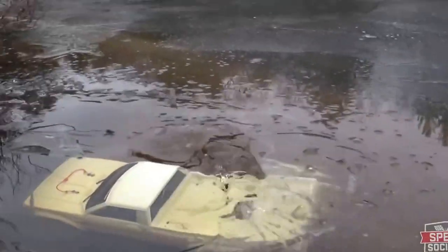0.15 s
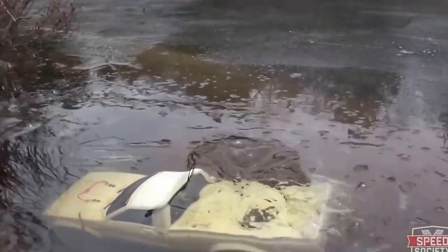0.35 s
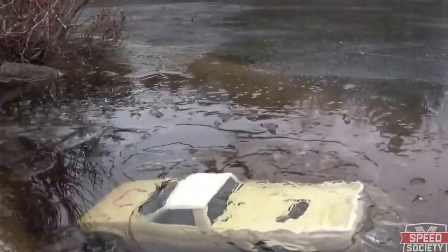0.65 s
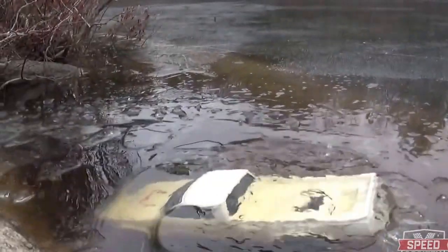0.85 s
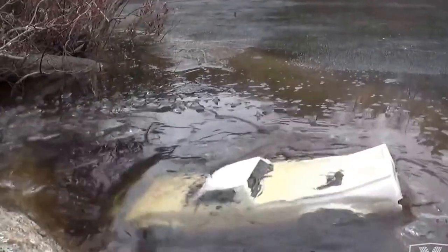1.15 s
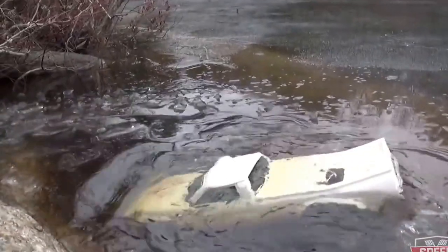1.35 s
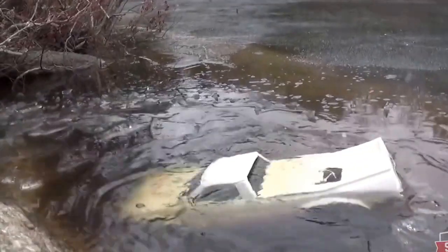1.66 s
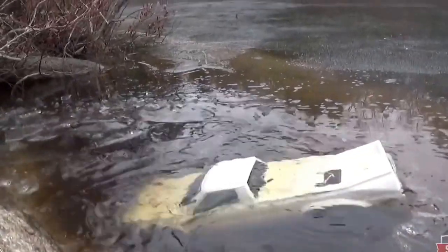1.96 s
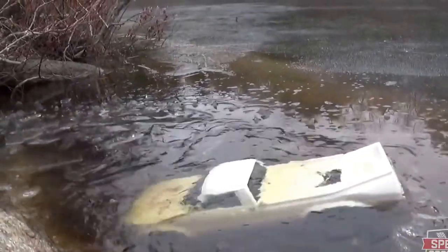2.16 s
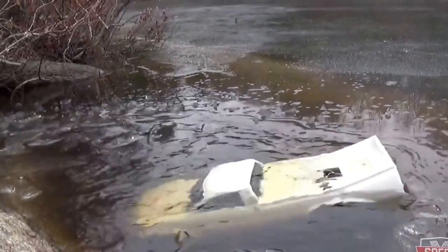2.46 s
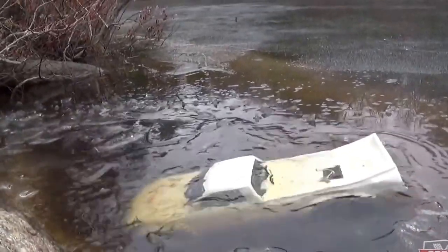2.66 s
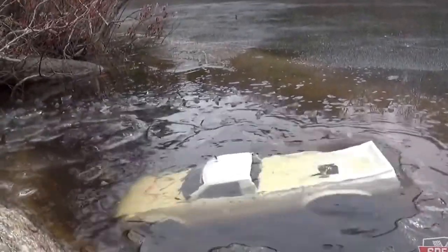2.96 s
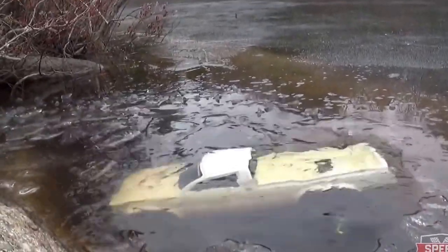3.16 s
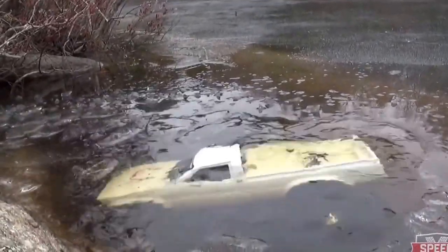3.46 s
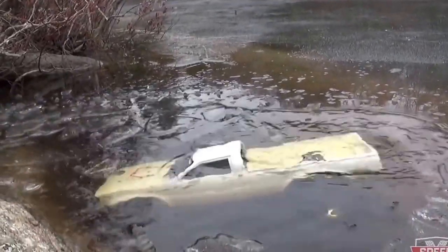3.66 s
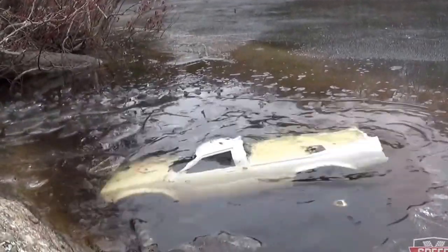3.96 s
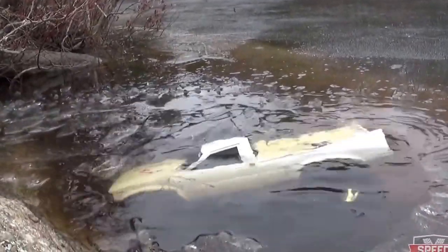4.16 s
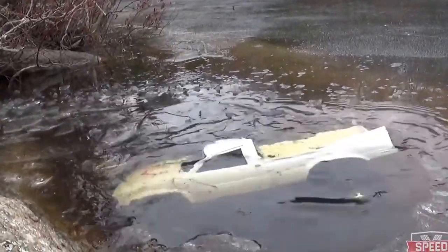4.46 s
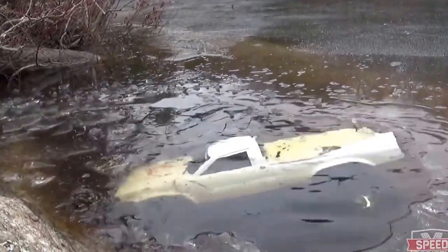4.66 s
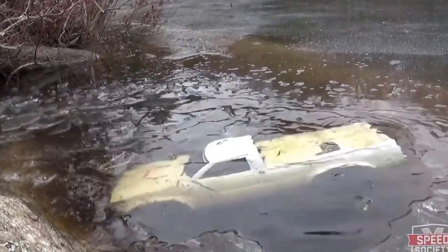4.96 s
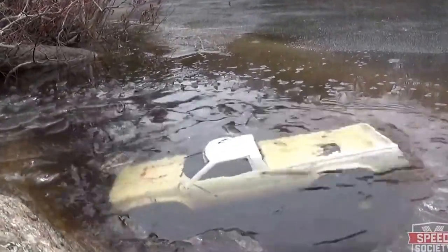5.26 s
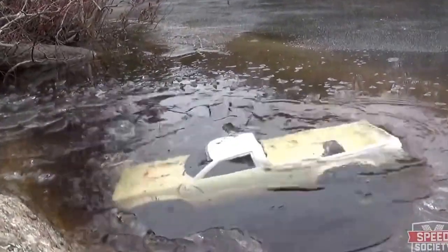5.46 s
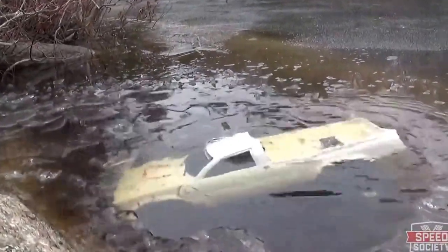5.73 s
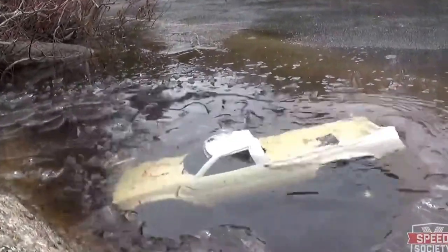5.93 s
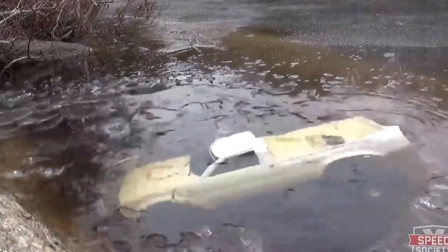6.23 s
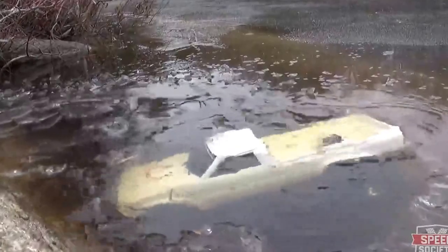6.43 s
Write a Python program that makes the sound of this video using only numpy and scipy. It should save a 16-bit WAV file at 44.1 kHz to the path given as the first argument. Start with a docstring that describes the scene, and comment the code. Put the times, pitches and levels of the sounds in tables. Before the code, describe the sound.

Water sloshes, plops and gurgles around a toy truck in a pond, with sharp little splashes and drips.

```python
"""At a shallow pond, a stereo microphone close to a floating toy truck whose wheels churn the water.
Water laps and sloshes under the thin hollow plastic shell, where air pockets plop and gurgle.
Drops snap on the shell and ring it, droplets click on open water, spray and foam hiss.
Behind this a faint tick pulses, something rattles once and a few dull thumps sound;
a low rumble and hiss lie under everything."""
import sys
import numpy as np
from scipy import signal
from scipy.fft import rfft, irfft, next_fast_len
from scipy.io import wavfile
from scipy.ndimage import uniform_filter1d, map_coordinates

SR = 44100
rng = np.random.default_rng(int(sys.argv[2]) if len(sys.argv) > 2 else 0)


def store_wav(level_fs):
    """Save 16-bit WAV to argv[1]."""
    pcm = np.round(np.clip(np.atleast_2d(level_fs), -1, 1) * 32767)
    wavfile.write(sys.argv[1], SR, pcm.T.astype(np.int16))


N = 290685
TIME = np.arange(N) / SR


def amp(db):
    return 10 ** (np.asarray(db) / 20)


def unit(x):
    return x / np.sqrt(np.mean(x ** 2) + 1e-20)


def along(points, hz):
    """Interpolates (Hz, value) points on a log axis."""
    freqs, values = np.transpose(points)
    return np.interp(np.log(hz + 1), np.log(freqs + 1), values)


def curve(rows, column):
    """One column of a timed table, one value per sample."""
    return np.interp(TIME, np.transpose(rows)[0], np.transpose(rows)[column])


def wobble(rate):
    """A smooth random curve, rate knots a second."""
    return map_coordinates(rng.standard_normal(int(N * rate / SR) + 4), [TIME * rate])


def filtered(x, response):
    """x through a complex response of frequency."""
    size = next_fast_len(N + SR // 2)
    return irfft(rfft(x, size) * response(np.fft.rfftfreq(size, 1 / SR)), size)[..., :N]


def resonances(modes):
    """Causal response of a few (Hz, width in Hz, dB) modes."""
    return lambda f: sum((-1) ** k * amp(db) * 1j * f * width / (hz * hz - f * f + 1j * f * width)
                         for k, (hz, width, db) in enumerate(modes))


# Noise across the microphone pair. Each row: frequency in Hz, left-right correlation.
STEREO_LIKENESS = [(300, 0.99), (2000, 0.83), (9000, 0.98)]

def rush(gain, patchy_db):
    """Stereo noise of rms 1, coloured by gain(Hz), with random louder and softer patches."""
    spectra = signal.stft(rng.standard_normal((2, N)), nperseg=256)[2]
    patches = uniform_filter1d(uniform_filter1d(rng.standard_normal(spectra.shape[1:]), 5, 0), 6, 1)
    pair = signal.istft(spectra * amp(patchy_db * unit(patches)), nperseg=256)[1][:, :N]
    angle = lambda hz: np.arccos(np.clip(along(STEREO_LIKENESS, hz), -1, 1)) / 2
    mid, side = filtered(pair, lambda hz: gain(hz) * [np.cos(angle(hz)), np.sin(angle(hz))])
    return unit(np.array([mid + side, mid - side]))


def place(start, waves, pan_db=0):
    """Sums one short wave per start time into stereo, panned to the truck plus pan_db."""
    at = np.round(start * SR).astype(int)
    pan_db = pan_db + curve(FOAM_AND_PAN, column=2)[at]
    samples = (at[:, None] + np.arange(waves.shape[1])).ravel()
    panned = [waves * amp(side * pan_db / 2)[:, None] for side in (1, -1)]
    return np.array([np.bincount(samples, channel.ravel(), N + SR)[:N] for channel in panned])


def bubbles(hz, t60, rise, attack_s, size):
    """Damped sines, one per row, whose pitch glides by the share rise every t60 seconds."""
    t = np.arange(size) / SR
    hz, t60, rise = (np.reshape(x, (-1, 1)) for x in (hz, t60, rise))
    phase = 2 * np.pi * hz * (t + rise * t * t / (2 * t60))
    return np.sin(phase) * amp(-60 * t / t60) * (1 - np.exp(-t / attack_s)) * (phase < np.pi * SR * t)


def swarm(level_db, centre_hz, octaves, cycles, spread, pan_db, count, size):
    """Randomly timed bubbles whose joint loudness follows a level curve."""
    when, rank = rng.random((count, 2)).T
    pitch, glide, pan = rng.standard_normal((count, 3)).T
    hz = np.clip(centre_hz * 2 ** (octaves * pitch), 300, 11500)
    waves = bubbles(hz, cycles / hz, 0.26 * glide, attack_s=0.0002, size=size)
    strength = amp(-spread * np.log(rank + .02))
    return amp(level_db) * unit(place(when * (N - 1) / SR, waves * strength[:, None], pan_db * pan))


# The air around the pond. Each row: frequency in Hz, relative level in dB.
AMBIENT_SPECTRUM = [(20, -24), (60, 0), (181, 2), (380, -7), (1560, -34.5), (4500, -30), (9500, -41),
                    (15800, -32)]
# Narrow bands in the rumble. Each row: centre in Hz, width in Hz, base level in dB.
DRONE_BANDS = [(99.2, 12.4, -59.5), (152.7, 9.6, -63)]

def ambience():
    """Rumble and hiss swell a little with the wash; droning bands sag slightly as the foam thins."""
    db = -42.5 + 0.2 * curve(WASH_LEVELS, column=1) + 1.26 * wobble(2.76)
    bed = amp(db) * rush(lambda hz: amp(along(AMBIENT_SPECTRUM, hz)), patchy_db=1.7)
    drone = 0
    for hz, width, band_db in DRONE_BANDS:
        band = filtered(rng.standard_normal(N), lambda f: 1 / (1 + (2 * (f - hz) / width) ** 2))
        drone += amp(band_db) * unit(band)
    return bed + amp(0.039 * (curve(FOAM_AND_PAN, column=1) + 48.0)) * drone


def tick():
    """A faint high tick at a steady pace, every other one weaker."""
    first_s, per_second = 0.0258, 29.92
    k = np.arange(int(N / SR * per_second) - 1)
    db = -50 - 4 * (k % 2 == 0)
    ping = bubbles(hz=2710, t60=0.018, rise=0, attack_s=0.0017, size=1500)
    return place(first_s + k / per_second, ping * amp(db)[:, None])


# The ring of the faint rattle. Each row: frequency in Hz, width in Hz, relative gain in dB.
RATTLE_MODES = [(1670, 65, 3), (2470, 99, -4)]

def rattle():
    """One short run of uneven small knocks into two resonances."""
    start_s, length_s, edge_s = 5.54, 0.2, 0.024
    gate = np.clip(np.minimum(TIME - start_s, start_s + length_s - TIME) / edge_s + .5, 0, 1)
    knocks = amp(2.8 * wobble(120)) * rng.standard_normal(N)
    return amp(-58) * gate * unit(filtered(knocks, resonances(RATTLE_MODES)))


# Dull thumps behind the water. Each row: start in seconds, level in dB, starting pitch in Hz.
LOW_THUMPS = [(5.071, -33.5, 130), (5.575, -34, 214), (6.077, -35, 174), (6.166, -41, 195)]

def thumps():
    """Soft low gulps that rise in pitch, with a hollow rough tail."""
    start, db, hz = np.transpose(LOW_THUMPS)
    t = np.arange(12000) / SR
    envelope = amp(db[:, None] - 60 * t / 0.42) * (1 - np.exp(-t / 0.0075))
    tail = place(start, rng.standard_normal(envelope.shape) * envelope)
    gulp = bubbles(hz, t60=0.087, rise=0.5, attack_s=0.0046, size=len(t)) * amp(db)[:, None]
    body = resonances([(270, 340, 7.2)])
    return place(start, gulp) + filtered(tail, lambda f: body(f) ** 2 / (1 + (f / 600) ** 4))


# The steady wash at the wheels. Each row: time in seconds, base levels of slosh and of spray in dB.
WASH_LEVELS = [(0, -50.5, -61), (1.3, -59, -57.5), (2.1, -48, -68.5), (3.0, -54.5, -63), (3.75, -61, -68.5),
               (4.5, -57.5, -58), (5.5, -61.5, -65), (5.9, -49.5, -58), (6.45, -43, -53),
               (6.59, -50, -51.5)]
# Waves meeting the shell. Each row: crest time, nominal rise and fall, all in seconds,
# then base levels of slosh and of spray in dB.
SHELL_LAPS = [(1.03, 0.17, 0.15, -43.5, -80), (1.58, 0.062, 0.05, -39.5, -49),
              (1.84, 0.093, 0.035, -38.5, -51), (2.261, 0.0043, 0.035, -31.5, -47),
              (2.444, 0.0215, 0.056, -39.5, -39.5), (2.56, 0.011, 0.11, -43, -57.5),
              (2.77, 0.088, 0.069, -44, -47), (3.094, 0.067, 0.052, -41.5, -47),
              (3.91, 0.063, 0.1, -47.5, -73), (4.282, 0.064, 0.06, -39, -45.5),
              (4.69, 0.11, 0.049, -47, -51.5), (6.15, 0.0071, 0.014, -31.5, -50.5)]
SLOSH_COLUMN, SPRAY_COLUMN = 1, 2
SLOSH_PACE, SPRAY_PACE = 0.81, 1.09  # a lap's spray rises and falls faster than its slosh

def churn(column, pace, lumps_db):
    """Level in dB of the wash plus the lumpier laps, which swell to a crest and drain."""
    foot_db, roundness = -9, 1.93  # roundness 1 is a pointed crest, more is flatter
    t, laps = TIME[::64], np.transpose(SHELL_LAPS)[:, :, None]
    crest, rise, fall = laps[:3]
    from_crest = pace * np.where(t < crest, (crest - t) / rise, (t - crest) / fall)
    lap_db = laps[2 + column] + foot_db * from_crest ** roundness
    lap_power = np.interp(TIME, t, np.sum(amp(lap_db) ** 2, axis=0))
    wash_power = amp(curve(WASH_LEVELS, column) + 0.67 * lumps_db) ** 2
    return 10 * np.log10(wash_power + lap_power * amp(lumps_db) ** 2)


# Foam at the truck, and where the truck sits before the microphone.
# Each row: time in seconds, base foam level in dB, the truck's left-over-right balance in dB.
FOAM_AND_PAN = [(0, -52.5, 2), (1.4, -51.5, 0), (2.6, -53, -1), (3.3, -60.5, 2.5), (5.8, -66.5, -0.5),
                (6.59, -54, 11.5)]
# The colour of the fizz. Each row: frequency in Hz, relative level in dB.
FOAM_SPECTRUM = [(900, -6), (1600, -2.5), (2800, 5.5), (5500, 0), (9000, 6), (12000, -2), (15800, -25)]

def foam():
    """Foam hisses in thin spatters and swells a little with the spray."""
    spray_db = churn(SPRAY_COLUMN, SPRAY_PACE, lumps_db=-16.5)
    db = curve(FOAM_AND_PAN, column=1) + 0.23 * (spray_db + 52.0)
    spatter_db = 2.07 * wobble(13) + 1.64 * wobble(240) ** 2
    return amp(db + spatter_db) * rush(lambda hz: amp(along(FOAM_SPECTRUM, hz)), patchy_db=1.5)


# Spray thrown up around the truck. Each row: frequency in Hz, relative level in dB.
SPRAY_SPECTRUM = [(900, 0.5), (2000, 3), (4000, -3.5), (9500, -10.5), (12000, -19), (15500, -44)]

def spray():
    """Wash and laps throw a bright hiss in spurts and a dense shower of droplets."""
    db = churn(SPRAY_COLUMN, SPRAY_PACE, lumps_db=3.8 * wobble(45))
    hiss = amp(db) * rush(lambda hz: amp(along(SPRAY_SPECTRUM, hz)), patchy_db=5.5)
    shower = swarm(db - 6, 3700, octaves=0.82, cycles=5.9, spread=2.0, pan_db=7.5, count=2500, size=300)
    return hiss + shower


# Big droplets on the pond beside the truck. Each row: start in seconds, level in dB, colour in Hz.
POND_DRIPS = [(0.243, -24, 8470), (0.306, -19, 5340), (0.395, -23, 6700), (0.642, -32, 3240),
              (0.808, -38, 4286), (1.249, -31, 4840), (1.321, -29, 3550), (1.663, -36, 3240),
              (2.0415, -37, 2740), (2.9376, -30, 4000), (2.948, -33, 3060), (2.972, -27.5, 7140),
              (3.504, -32.5, 4120), (3.9777, -35, 2700), (4.686, -30.5, 3000), (4.9232, -27.5, 8300),
              (4.991, -27.5, 7200), (5.1219, -31, 8100), (5.1602, -33.5, 2900), (5.779, -36, 4100),
              (6.2032, -32, 2750)]

def drips():
    """A droplet on open water ticks, a few cycles in a spit of noise; small ones follow the foam level."""
    when, rank, pitch = rng.random((800, 3)).T
    small_start = when * (N - 1) / SR
    foam_db = curve(FOAM_AND_PAN, column=1)[(small_start * SR).astype(int)]
    small_drips = [small_start, foam_db + 9 - 4 * np.log(rank + .04), 1700 * 5 ** pitch]
    start, db, hz = np.concatenate([np.transpose(POND_DRIPS), small_drips], axis=1)
    t = np.arange(500) / SR
    spit = 0.8 * rng.standard_normal((len(start), len(t))) * amp(-60 * t / 0.0034)
    ping = bubbles(hz, t60=11.0 / hz, rise=0, attack_s=0.00008, size=len(t))
    ticks = place(start, (ping + spit) * amp(db)[:, None], pan_db=3 * rng.standard_normal(len(start)))
    return filtered(ticks, lambda f: 1j * f / (1500 + 1j * f) / (1 + (f / 11000) ** 6))


# Air pockets filling up. Each row: start and length in seconds, level in dB, first and last pitch in Hz.
FILLING_POCKETS = [(1.168, 0.037, -43.5, 2840, 1730), (3.871, 0.079, -49, 1780, 1150),
                   (4.187, 0.0694, -51, 1515, 1222)]

def gurgles():
    """A stuttering tone sinks in pitch while water works into a pocket of air."""
    start, length, db, first_hz, last_hz = np.transpose(FILLING_POCKETS)[:, :, None]
    progress = np.clip(np.arange(4000) / SR / length, 0, 1)
    swell = np.sqrt(np.sin(np.pi * progress).clip(0))
    stutter = 0.61 + unit(uniform_filter1d(rng.standard_normal(progress.shape), size=50, axis=1))
    phase = 2 * np.pi * np.cumsum(first_hz * (last_hz / first_hz) ** progress, axis=1) / SR
    return place(start[:, 0], amp(db) * swell * stutter * np.sin(phase))


# Slopping water, heard close. Each row: frequency in Hz, relative level in dB.
SLOSH_SPECTRUM = [(200, -7), (300, 4), (800, 0.5), (2500, -12), (6000, -36)]
# The air under the shell. Each row: resonance in Hz, width in Hz, relative gain in dB.
HOLLOW_MODES = [(428, 98, -4.5), (613, 71, 2), (984, 116, 1.5), (1202, 160, -1.5)]

def slosh():
    """Water slops under the shell: lumpy noise, the boom of the hollow and ringing bubbles."""
    db = churn(SLOSH_COLUMN, SLOSH_PACE, lumps_db=5.2 * wobble(25))
    wash = amp(db - 6.0) * rush(lambda hz: amp(along(SLOSH_SPECTRUM, hz)), patchy_db=2.5)
    boom = amp(db - 10.5) * rush(lambda hz: np.abs(resonances(HOLLOW_MODES)(hz)), patchy_db=3.0)
    rings = swarm(db - 10, 857.4, octaves=0.706, cycles=43, spread=-1.5, pan_db=2.5, count=600, size=3500)
    return wash + boom + rings


# Drops landing on the shell. Each row: start in seconds, level in dB, colour in Hz.
SHELL_DROPS = [(0.356, -28, 7380), (0.524, -26.5, 9900), (1.068, -25, 10380), (1.404, -32, 2550),
               (1.4381, -28, 2560), (1.577, -31, 3600), (1.7872, -30, 4400), (1.849, -23.5, 3790),
               (1.9408, -32.5, 2380), (1.981, -26, 3760), (2.22, -31.5, 3070), (2.2558, -9.5, 7530),
               (2.292, -23, 6700), (2.4235, -23, 3560), (2.4375, -13.5, 3840), (2.47, -27, 3540),
               (2.501, -27.5, 3850), (2.576, -30.5, 4060), (2.708, -29.5, 5700), (2.893, -31.5, 4670),
               (3.083, -30, 3740), (3.1898, -30.5, 8900), (4.163, -35, 2200), (4.238, -29.5, 3950),
               (4.3899, -35, 2600), (4.413, -27, 8400), (4.54, -31.5, 3300), (4.809, -29, 4520),
               (6.2353, -30.5, 2780)]
# The ring of the thin plastic. Each row: resonance in Hz, width in Hz, relative gain in dB.
SHELL_MODES = [(3780, 260, 1), (7200, 900, -39)]

def snaps():
    """Each drop spits noise at its own colour, cracks and rings the plastic; big drops splatter longer."""
    start, db, hz = np.transpose(SHELL_DROPS)
    t = np.arange(3000) / SR
    t60 = 0.016 * amp(0.27 * (db[:, None] + 52.0))
    noise = rng.standard_normal((len(start), len(t)))
    pan = noise[:, 0]
    envelope = (1 - np.exp(-t / 0.000063)) * amp(db[:, None] - 60 * t / t60)
    ring = filtered(place(start, noise * envelope, 2.1 * pan), resonances(SHELL_MODES))
    flutter = 0.74 + unit(uniform_filter1d(rng.standard_normal(noise.shape), size=24, axis=1))
    spit = place(start, flutter * envelope * np.sin(2 * np.pi * hz[:, None] * t), 0.62 * pan)
    impact = place(start, noise * envelope * amp(1.5 - 25 * t / t60), 3.2 * pan)
    crack = filtered(impact, resonances([(9250, 3900, -5.5)]))
    return filtered(crack + amp(-9) * spit + amp(-2) * ring, lambda f: 1 / (1 + (f / 11800) ** 8))


# Air pockets under the shell, heard close. Each row: start in seconds, level in dB, pitch in Hz.
AIR_POCKETS = [(0.007, -22.5, 599), (0.306, -34, 1630), (0.493, -31, 593), (1.365, -34, 937),
               (1.437, -27.5, 1960), (1.531, -27, 1240), (1.554, -28, 1200), (1.602, -26.5, 1200),
               (1.627, -25.5, 615), (1.693, -32.5, 613), (1.792, -23.5, 517), (1.853, -20, 591),
               (1.869, -23.5, 537), (1.981, -27, 630), (2.057, -25, 621), (2.218, -17.5, 634),
               (2.258, -10, 613), (2.293, -17, 449), (2.425, -25, 1106), (2.473, -18.5, 551),
               (2.555, -23.5, 504), (2.59, -25.5, 1262), (2.782, -24, 1140), (2.81, -21.5, 561),
               (3.126, -24.5, 598), (3.36, -31, 584), (4.041, -31.5, 1710), (4.18, -29, 1247),
               (4.267, -28, 770), (4.391, -28.5, 1750), (4.661, -21, 1500), (4.709, -32.5, 615),
               (4.765, -35, 478), (4.807, -25.5, 1484), (5.003, -36, 1160), (5.304, -36.5, 632),
               (5.399, -34.5, 606), (6.553, -31.5, 1940)]

def plops():
    """Each air pocket rings unevenly, small ones more briefly, and knocks the hollow with a rough push."""
    start, db, hz = np.transpose(AIR_POCKETS)
    t, level = np.arange(3500) / SR, amp(db)[:, None]
    t60 = 0.065 * (700 / hz[:, None]) ** 0.71
    noise = rng.standard_normal((len(start), len(t)))
    glide, pan = noise[:, 0], noise[:, 1]
    ring = bubbles(hz, t60, rise=0.065 * glide, attack_s=0.94 / hz[:, None], size=len(t))
    ring *= 1 + 0.3 * unit(uniform_filter1d(noise, size=150, axis=1))
    push_envelope = amp(-60 * t / (0.38 * t60)) * (1 - np.exp(-t / 0.00052))
    push = place(start, noise * push_envelope * level, 0.5 * pan)
    knock = filtered(push, resonances(HOLLOW_MODES))
    slap = filtered(push, lambda f: resonances([(2000, 3000, -2)])(f) ** 2)
    return amp(-4) * place(start, ring * level, 1.94 * pan) + amp(9.5) * knock + slap


def scene():
    """The water at the truck, thinned below 150 Hz, over the background sounds."""
    water = slosh() + spray() + foam() + plops() + gurgles() + snaps() + drips()
    water = filtered(water, lambda f: (1j * f / (150 + 1j * f)) ** 2)
    return water + thumps() + rattle() + tick() + ambience()


def record(dry):
    """Two closely spaced microphones hear the bass alike; nothing passes above the band limit."""
    mono_below_hz, top_hz = 200, 15850
    mid, side = (dry[0] + dry[1]) / 2, (dry[0] - dry[1]) / 2
    side = filtered(side, lambda hz: 1 / (1 + (mono_below_hz / (hz + 1)) ** 4))
    return filtered(np.array([mid + side, mid - side]), lambda hz: hz < top_hz)


dry = scene()
out = record(dry)
store_wav(out)
```